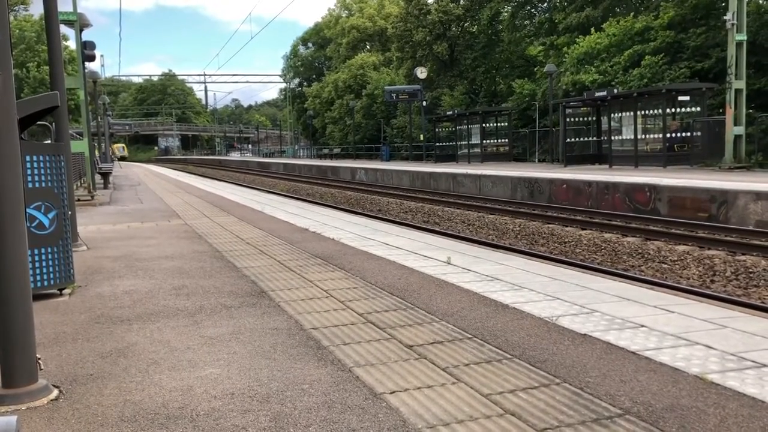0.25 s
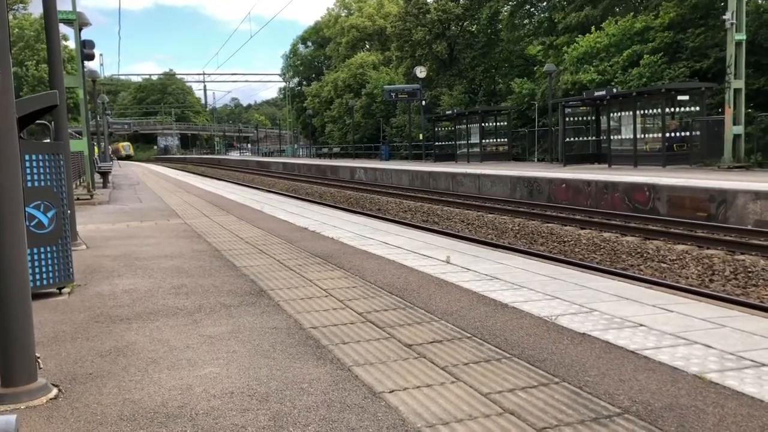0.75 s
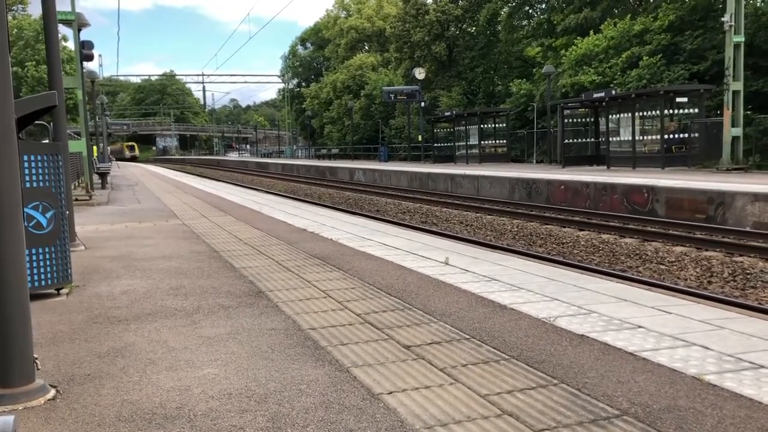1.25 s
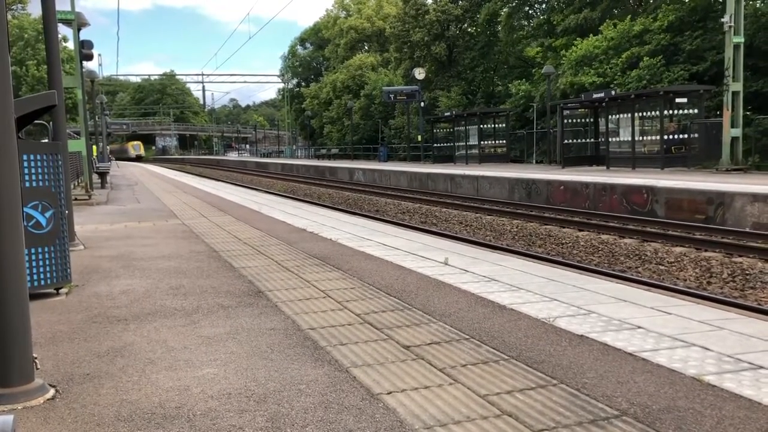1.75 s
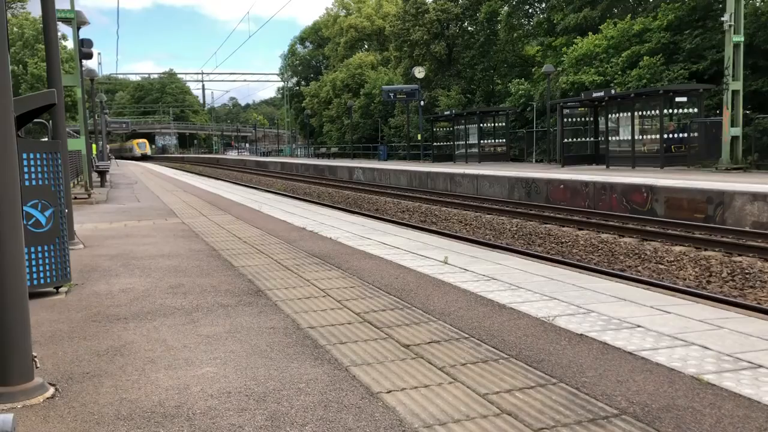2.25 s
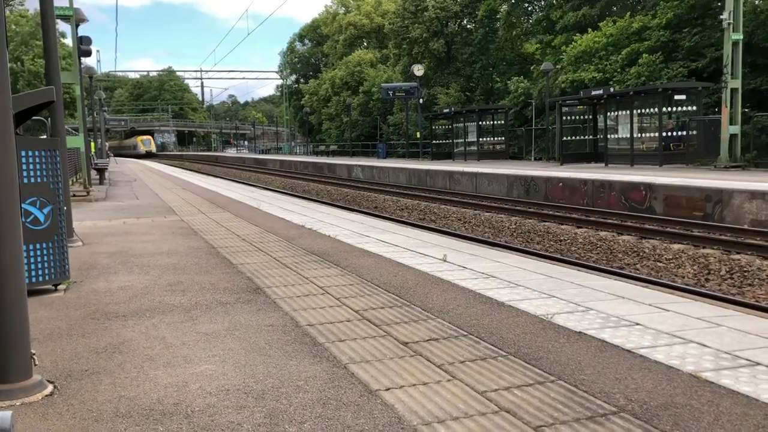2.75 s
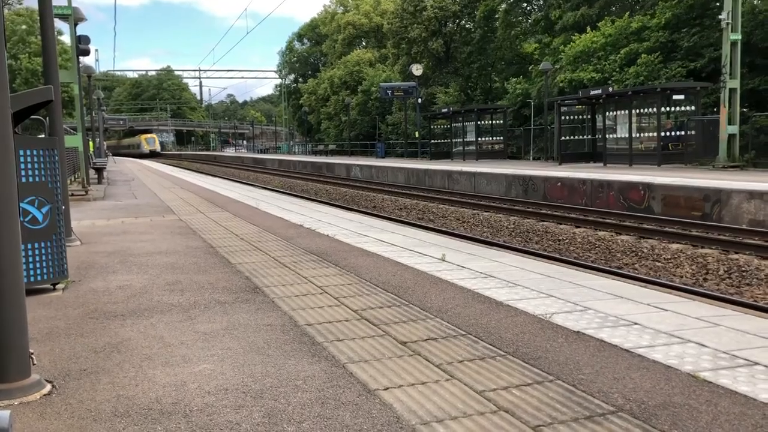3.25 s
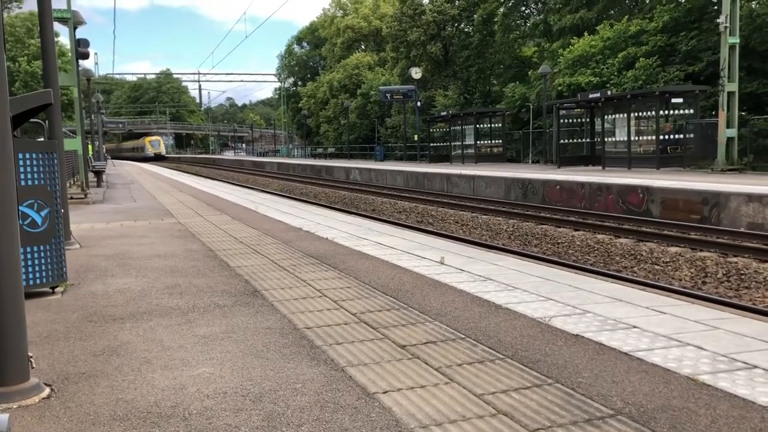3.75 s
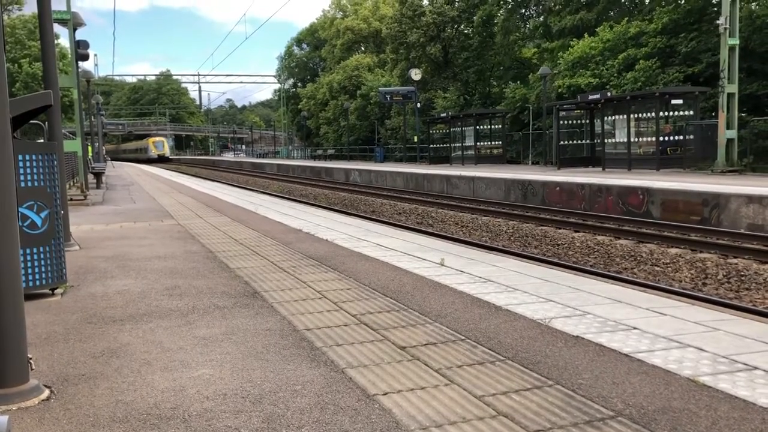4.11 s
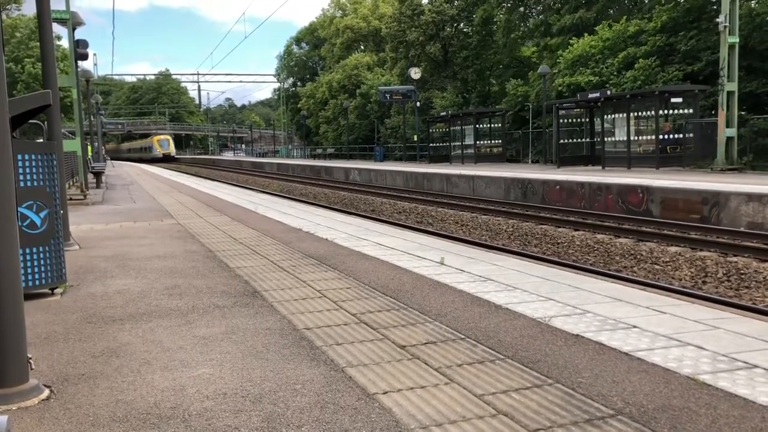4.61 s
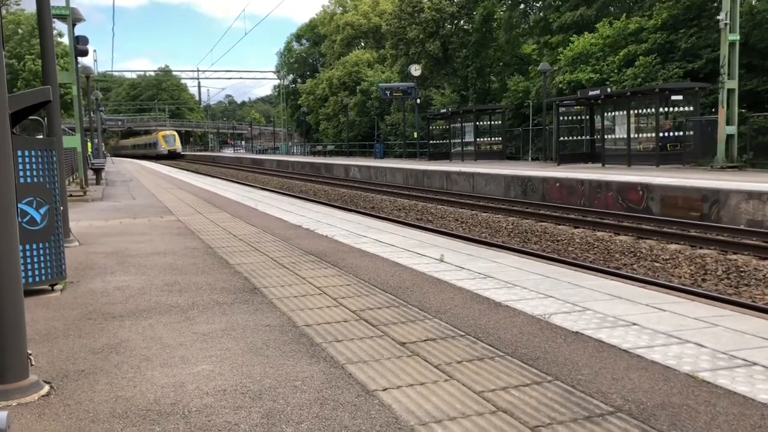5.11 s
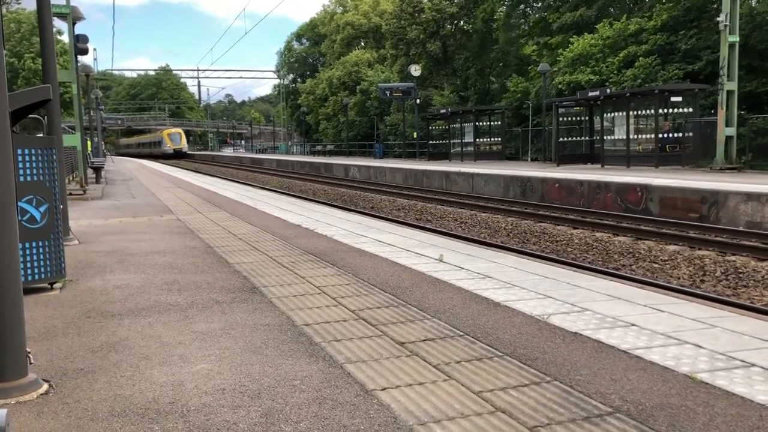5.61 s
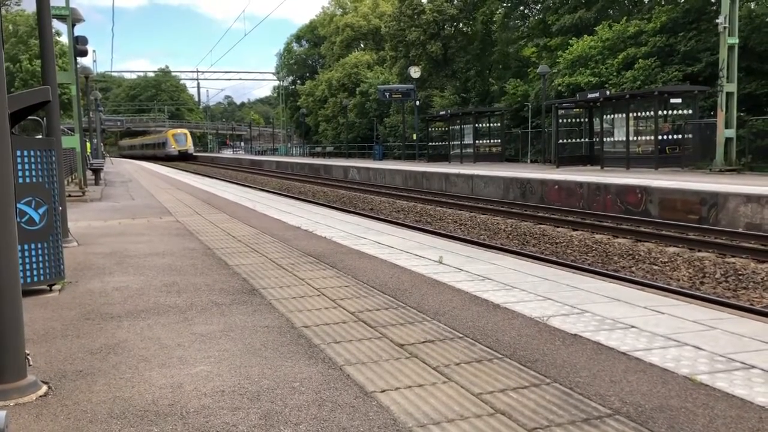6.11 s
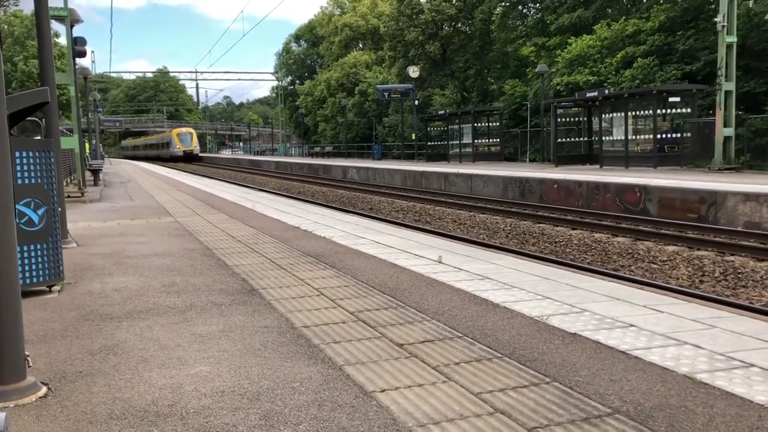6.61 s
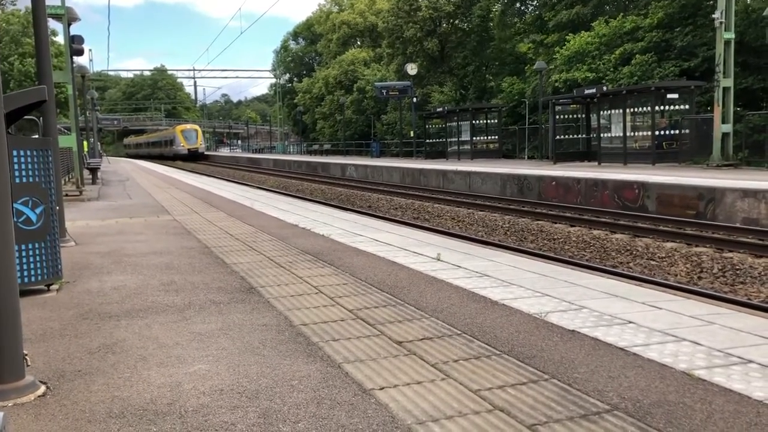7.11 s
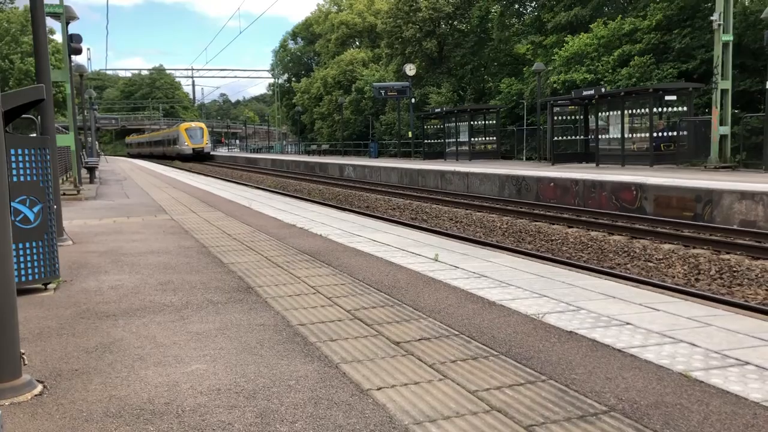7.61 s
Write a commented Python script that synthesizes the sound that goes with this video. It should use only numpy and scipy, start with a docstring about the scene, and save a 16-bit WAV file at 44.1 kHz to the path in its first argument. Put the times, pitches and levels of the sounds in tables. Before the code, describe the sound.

Bright, piercing rail hiss with a thin fluttering whistle and high squeals shimmers as a train nears an outdoor platform, then stops abruptly.

```python
"""Electric train nearing a platform

An electric train rolls towards an open platform, heard by one microphone far down the line.
Patchy noise bands make the loud, bright hiss of wheels on rails; fluttering modes and sines whistle and squeal.
The rubbing stops abruptly, and narrow modes that swelled beneath it ring out.
Under it lie roar, gears, motor hum and outdoor air, all noise or tones; late wind bumps are low noise and pulses.
"""
import sys
import numpy as np
from scipy import signal
from scipy.fft import rfft, irfft, next_fast_len
from scipy.io import wavfile
from scipy.ndimage import uniform_filter1d, map_coordinates

SR = 44100
rng = np.random.default_rng(int(sys.argv[2]) if len(sys.argv) > 2 else 0)


def generate_wav(signal):
    """Clip the signal to [-1, 1] and save it as 16-bit WAV at the path in sys.argv[1]."""
    frames = np.transpose(np.atleast_2d(signal))
    scaled = np.clip(frames, -1, 1) * 32767
    pcm = np.round(scaled).astype(np.int16)
    wavfile.write(sys.argv[1], SR, pcm)


N = 346626
TIME = np.arange(N) / SR
MIDWAY_S = 4  # about halfway through the approach, where the layers' levels are given


def amp(db):
    """Decibels to gain."""
    return 10 ** (np.asarray(db) / 20)


def unit(x):
    """Scale to rms 1."""
    return x / np.sqrt(np.mean(np.abs(x) ** 2) + 1e-20)


def curves(rows):
    """One value per sample for each column after the time."""
    times, *columns = np.transpose(rows)
    return [np.interp(TIME, times, column) for column in columns]


def wobble(rate):
    """A smooth random curve of rms 1, rate knots a second."""
    knots = rng.standard_normal(int(N * rate / SR) + 4)
    return unit(map_coordinates(knots, [TIME * rate]))


def filtered(x, response):
    """Apply a response of frequency to x."""
    size = next_fast_len(N + SR // 4)  # padding keeps the tail from wrapping round
    return irfft(rfft(x, size) * response(np.fft.rfftfreq(size, 1 / SR)), size)[:N]


def colour(hz, spectrum, modes):
    """Gain of a broad spectrum with resonances standing on it."""
    knot_hz, knot_db = np.transpose(spectrum)
    broad_db = np.interp(np.log(hz + 1), np.log(knot_hz), knot_db)
    lift = sum((amp(peak_db) ** 2 - 1) / (1 + (2 * (hz - centre) / width) ** 2)
               for centre, width, peak_db in modes)
    return amp(broad_db) * np.sqrt(np.maximum(1 + lift, .05))


def rush(spectrum, modes, patchy_db):
    """Coloured noise of rms 1 in which narrow bands swell and fade on their own."""
    z = signal.stft(rng.standard_normal(N), nperseg=2048)[2]
    field = uniform_filter1d(rng.standard_normal(z.shape), size=2, axis=0)  # across frequency
    field = uniform_filter1d(field, size=9, axis=1)  # along time
    noise = signal.istft(z * amp(patchy_db * unit(field)), nperseg=2048)[1][:N]
    return unit(filtered(noise, lambda hz: colour(hz, spectrum, modes)))


def driven_mode(pitch_hz, width, skirt):
    """One mode shaken at random: a fuzzy, fluttering line of rms 1 (width and skirt in Hz)."""
    shape = lambda hz: 1 / (1 + 2j * hz / width) / (1 + (hz / skirt) ** 2)
    swing = filtered(rng.standard_normal(N), shape) + 1j * filtered(rng.standard_normal(N), shape)
    carrier = np.exp(2j * np.pi * np.cumsum(pitch_hz * np.ones(N)) / SR)
    return unit(np.real(swing * carrier))


def swell(peak, half, pitch_hz, waver, flutter_db):
    """A sine under a bell-shaped envelope, wavering by a few Hz and fluttering in level."""
    span = np.abs(TIME - peak) < 2.5 * half
    t = TIME[span]
    knots = np.linspace(0, TIME[-1], num=400)
    drift, flutter = [np.interp(t, knots, row) for row in rng.standard_normal((2, 400))]
    sine = np.sqrt(2) * np.sin(2 * np.pi * np.cumsum(pitch_hz + waver * drift) / SR)
    tone = np.zeros(N)
    tone[span] = sine * amp(flutter_db * flutter) * np.exp(-((t - peak) / half) ** 2)
    return tone


def swells(rows):
    """Summed gain of bell-shaped swells, one for each (peak time [s], half length [s], level [dB])."""
    return sum(amp(db) * np.exp(-((TIME - peak) / half) ** 2) for peak, half, db in rows)


def follow(control, db, share, rise_db_per_s):
    """Gain that takes a share of a control's swings about its mean, with a steady drift in dB."""
    control_db, = curves(control)
    swing_db = control_db - control_db.mean()
    return amp(db + share * swing_db + rise_db_per_s * (TIME - MIDWAY_S))


# Deep rumble coming and going along the line: (peak time [s], half length [s], level [dB])
RUMBLE_SWELLS = [(1.2, 2.5, -61.5), (4.6, 1.1, -57)]
# Rumble tone colour: (frequency [Hz], relative level [dB])
RUMBLE = [(20, -35), (42, -3), (68, 1.5), (110, -11), (200, -4), (500, -34)]
# Outdoor air tone colour: (frequency [Hz], relative level [dB])
AIR = [(20, -36), (45, -6), (80, -2), (150, 0), (220, 0), (320, 0.5), (600, -4.5), (1200, -2), (2200, -18),
       (4000, -23), (8000, -27), (15700, -23)]


def outdoors():
    """Steady noise for still air over the platform, and swelling low noise for a far rumble."""
    rumble = swells(RUMBLE_SWELLS) * rush(RUMBLE, [], patchy_db=-0.5)
    return amp(-51.5) * rush(AIR, [], patchy_db=1.0) + rumble


# Gusts at the microphone: (peak time [s], half length [s], level [dB])
GUSTS = [(6.72, .06, -42), (7.13, .16, -51.5), (7.48, 0.13, -42), (7.65, 0.031, -38), (7.84, 0.17, -39)]
# Buffeting tone colour: (frequency [Hz], relative level [dB])
BUFFET = [(20, -35), (50, 1), (95, 4), (160, -6.0), (240, -21), (800, -48)]
# Single eddies hitting the microphone: (time [s], nominal level [dB], starting pitch [Hz], decay time [s])
BUMPS = [(6.674, -25.5, 181, 0.014), (7.397, -23.5, 160, 0.015), (7.472, -31, 200, 0.029),
         (7.614, -19.5, 169, 0.014)]


def wind():
    """Low buffeting, with single eddies that push once and die away."""
    buffet = swells(GUSTS) * amp(1.8 * wobble(22)) * rush(BUFFET, [], patchy_db=-2.0)
    for start, db, hz, length in BUMPS:
        age = np.maximum(TIME - start, 0) / length
        churn_response = lambda f: 1 / (1 + (f / (2.0 * hz)) ** 3)
        churn = unit(filtered(rng.standard_normal(N), churn_response))
        push = np.sin(2 * np.pi * hz * length * 3 * np.log1p(age / 3))  # pitch sinks as the eddy slows
        envelope = 1.86 * (1 - np.exp(-3 * age)) * np.exp(-age)
        buffet = buffet + amp(db) * envelope * (0.51 * push + 0.42 * churn)
    return buffet


# Uneven level of the low-mid roar, of which only the deviation from the mean counts: (time [s], level [dB])
ROLL = [(0.0, -50.5), (0.96, -44.5), (1.22, -41), (1.29, -48), (1.38, -39.5), (1.64, -47), (1.92, -40.5),
        (4.97, -36.5), (5.06, -44.5), (5.51, -37), (5.6, -47.5), (5.84, -40.5), (5.89, -44.5),
        (6.37, -37.5), (6.44, -47), (6.63, -40.5), (7.03, -47), (7.62, -42.5), (7.73, -62), (7.86, -47)]
# Roar tone colour: (frequency [Hz], relative level [dB])
ROAR = [(200, -27), (400, -10), (650, -6), (950, -0.5), (1300, -5), (1450, -14), (2200, -36)]
# Roar resonances: (centre [Hz], width [Hz], level over the broad spectrum [dB])
ROAR_MODES = [(475, 15, 8.8), (574.5, 15, 12.4), (698, 31, 10.8), (743, 41, 13.5), (868, 32, 11.2),
              (925, 23, 9.6), (1067, 28, 8.6), (1226, 23, 6.3), (1336, 27, 10)]


def rolling_roar():
    """The distant roll: resonant low-mid noise with an uneven, flickering level."""
    gain = follow(ROLL, db=-42.5, share=1.0, rise_db_per_s=-0.24) * amp(1.1 * wobble(40))
    return gain * rush(ROAR, ROAR_MODES, patchy_db=3.0)


# Brief grating of the running gear: (peak time [s], half length [s], level [dB])
GEAR_SWELLS = [(3.24, 0.077, -50.5)]
# Gear tone colour: (frequency [Hz], relative level [dB])
GEAR = [(1000, -17), (1500, 0.5), (1850, 5), (2050, -1), (2700, -10), (3200, -8), (3800, -19), (4500, -13),
        (7000, -47)]
# Gear resonances: (centre [Hz], width [Hz], level over the broad spectrum [dB])
GEAR_MODES = [(1566, 88, 11.2), (1753, 62, 10.7), (1855, 60, 7.2), (2150, 48, 10), (2360, 106, 10)]


def running_gear():
    """Resonant mid noise, uneven like the roar, that rises as the train nears and grates briefly."""
    gain = follow(ROLL, db=-51.0, share=0.82, rise_db_per_s=0.95) + swells(GEAR_SWELLS)
    return gain * rush(GEAR, GEAR_MODES, patchy_db=4.0)


# Swells of the motor hum: (peak time [s], half length [s], level [dB])
HUM_SWELLS = [(1.34, 0.24, -49), (2.0, 0.089, -50)]


def motor_hum(start_hz=514, sag_hz_per_s=20, start_db=-62.5, fade_db_per_s=0.5):
    """A wavering sine that sinks with the speed and fades, apart from two swells."""
    pitch_hz = start_hz - sag_hz_per_s * TIME + 1.48 * wobble(14)
    gain = amp(start_db - fade_db_per_s * TIME) + swells(HUM_SWELLS)
    return gain * amp(1.5 * wobble(17)) * unit(np.sin(2 * np.pi * np.cumsum(pitch_hz) / SR))


# Swells of the running gear's whine: (peak time [s], half length [s], level [dB])
WHINE_SWELLS = [(1.1, 1.1, -52.5), (6.82, 0.32, -45.5), (7.45, 0.26, -47.5)]


def gear_whine():
    """One randomly driven mode, heard only in swells."""
    return swells(WHINE_SWELLS) * driven_mode(1088, width=72, skirt=56)


# Tone colour of the nearing train: (frequency [Hz], relative level [dB])
NEAR = [(100, -16), (500, 14), (1100, -3), (1600, -6.5), (2400, -2.5), (3100, 3.5), (3800, 0), (4800, 5.5),
        (7200, -3), (10000, -6), (15700, -24)]
# Its resonances: (centre [Hz], width [Hz], level over the broad spectrum [dB])
NEAR_MODES = [(755, 62, 4.8), (1110, 65, 6.6), (1340, 50, 5.6), (1570, 55, 8), (1880, 43, 17),
              (2030, 67, 11), (2305, 130, 13.5), (3150, 200, 3.1), (4140, 86, 5)]


def nearing_rush():
    """Broad resonant noise that grows steadily as the train nears, 2.2 dB a second."""
    return amp(-45.5 + 2.2 * (TIME - TIME[-1])) * rush(NEAR, NEAR_MODES, patchy_db=2.5)


def train():
    """The rolling train under the rail noise: roar, gear, hum, whine and rush."""
    return rolling_roar() + running_gear() + motor_hum() + gear_whine() + nearing_rush()


# Steel modes that outlast the rubbing: (frequency [Hz], level at the release [dB])
RING_OUT = [(12182, -41), (12295, -43), (13211, -49), (13248, -43), (14158, -53), (14395, -51),
            (15434, -45)]


def ring_out(release=7.6, t60=0.52):
    """Lightly damped modes build up under the hiss and outlast it (release and t60 in s)."""
    decay = amp(-60 * np.maximum(TIME - release, 0) / t60)
    envelope = np.clip(TIME / release, 0, 1) ** 4 * decay
    return envelope * sum(amp(db) * driven_mode(hz, width=10, skirt=50) for hz, db in RING_OUT)


# Squeals: (peak time [s], half length [s], frequency [Hz], level [dB])
SQUEALS = [(.4, .45, 15276, -33), (.8, .25, 15515, -38), (.8, .4, 13415, -37), (1.4, .17, 13102, -31),
           (1.98, .16, 13412, -21), (2.4, .3, 9180, -38), (2.55, .3, 13405, -35), (2.92, .17, 13483, -28),
           (3.0, .2, 14448, -33), (4.25, .25, 13408, -27), (4.62, .15, 13380, -28), (4.88, .08, 13380, -23),
           (5.1, .35, 14448, -34), (5.35, .15, 13366, -31), (5.54, .07, 9279, -26), (6.07, .13, 13480, -26),
           (6.55, .15, 13385, -32), (7.08, .15, 13460, -31)]


def squeals():
    """Stick-slip squeals, each a high sine that wavers, flutters, swells and fades."""
    return sum(amp(db) * swell(peak, half, hz, waver=6.8, flutter_db=3.5)
               for peak, half, hz, db in SQUEALS)


def rubbing(stop_s=7.575, fall_db_per_s=163):
    """Gain that holds while the wheels rub and falls fast once they stop."""
    return amp(-fall_db_per_s * np.maximum(TIME - stop_s, 0))


# Level of the whistling band, counted as uneven swings about the mean: (time [s], level [dB])
WHISTLE = [(0.0, -37), (1.81, -30), (2.1, -34), (2.36, -25.5), (2.67, -28.5), (3.07, -23), (3.75, -30),
           (3.79, -25.5), (5.58, -22), (5.64, -27.5), (6.13, -22), (6.34, -26.5), (7.09, -27.5),
           (7.41, -23.5), (7.56, -33)]
# Flares of the whistle: (peak time [s], half length [s], level [dB])
WHISTLE_FLARES = [(2.36, .07, -33), (3.08, 0.027, -23), (4.68, .07, -30), (5.1, .04, -27),
                  (6.08, 0.056, -25.5), (7.28, 0.051, -28)]


def whistle(start_hz=7270, sag_hz=80, settle_s=4, flutter_db=2.5):
    """One wheel mode flutters, flares and sinks as the train slows; a lower one sings faintly with it."""
    pitch_hz = start_hz - sag_hz * (1 - np.exp(-TIME / settle_s))
    gain = follow(WHISTLE, db=-31.7, share=1.27, rise_db_per_s=0.25) + swells(WHISTLE_FLARES)
    main = gain * driven_mode(pitch_hz + 7 * wobble(9), width=49, skirt=145)
    under_gain = follow(WHISTLE, db=-49, share=1.0, rise_db_per_s=-1.1)
    under = under_gain * driven_mode(5635, width=51, skirt=31)
    return (main * amp(flutter_db * wobble(32)) + under) * rubbing()


# Tone colour of the band around the whistle: (frequency [Hz], relative level [dB])
BAND = [(6700, -39), (7010, 0.5), (7075, 2), (7150, 0.5), (7320, 1.5), (7430, 5.5), (7500, 4.5),
        (7590, 0.5), (7690, -2.5), (8000, -35)]


def whistle_band():
    """A noise band around the whistle that shares its uneven level."""
    return follow(WHISTLE, db=-31.5, share=0.68, rise_db_per_s=-0.1) * rush(BAND, [], patchy_db=2.0)


# Level of the bright hiss, counted as uneven swings about the mean: (time [s], level [dB])
HISS_LEVEL = [(0.0, -33), (0.46, -25.5), (0.82, -27), (1.05, -20.5), (1.2, -26.5), (1.32, -21),
              (1.73, -25.5), (1.94, -19.5), (2.48, -23.5), (2.92, -18.5), (3.75, -23), (3.92, -18),
              (4.51, -17), (4.76, -20), (4.88, -16), (4.95, -19), (5.45, -15.5), (5.56, -23.5), (5.96, -16),
              (6.42, -21.5), (6.7, -17.5), (6.93, -22), (7.35, -17.5), (7.56, -24)]
# Body tone colour: (frequency [Hz], relative level [dB])
BODY = [(3000, -43), (4000, -25), (4700, -13.5), (5300, -12), (6200, -5.5), (6700, -1.5), (7000, -1),
        (7600, -7.5), (9000, -42)]
# Body resonances: (centre [Hz], width [Hz], level over the broad spectrum [dB])
BODY_MODES = [(5085, 54, 7.5), (5340, 54, 4.6), (5606, 83, 9.1), (5920, 37, 4.3), (6160, 35, 4.9)]


def rail_body():
    """The lower part of the rubbing: resonant noise that gains as the train nears."""
    gain = follow(HISS_LEVEL, db=-36.0, share=0.85, rise_db_per_s=1.15)
    return gain * rush(BODY, BODY_MODES, patchy_db=3.5)


# Hiss tone colour: (frequency [Hz], relative level [dB])
HISS = [(5000, -32), (6800, -9), (7800, -1.5), (8400, 0.5), (9500, 1.5), (10100, 0), (11000, -5.5),
        (13000, -24)]
# Hiss resonances: (centre [Hz], width [Hz], level over the broad spectrum [dB])
HISS_MODES = [(8840, 80, 1.6), (9280, 46, 3.4), (9190, 26, 11.5)]


def rail_hiss():
    """The middle part of the rubbing: resonant noise that gains as the train nears."""
    gain = follow(HISS_LEVEL, db=-31.0, share=0.95, rise_db_per_s=1.24)
    return gain * rush(HISS, HISS_MODES, patchy_db=2.5)


# Fizz tone colour: (frequency [Hz], relative level [dB])
FIZZ = [(7500, -44.5), (9500, -10.5), (10300, -5.5), (11300, -1), (12500, 0.5), (13400, 0), (13800, -2.5),
        (14800, -9), (15700, -7.5)]
# Fizz resonances: (centre [Hz], width [Hz], level over the broad spectrum [dB])
FIZZ_MODES = [(11220, 160, 3), (12215, 100, 6), (12390, 90, 4), (13260, 90, 3), (13420, 110, 2),
              (15520, 70, 3)]


def rail_fizz():
    """The brightest, loudest part of the rubbing: resonant noise with an uneven level."""
    gain = follow(HISS_LEVEL, db=-20.5, share=0.98, rise_db_per_s=-0.05)
    return gain * rush(FIZZ, FIZZ_MODES, patchy_db=2.0)


def thicket(hz, spacing, depth_db):
    """Countless narrow steel modes of random strength, spacing Hz apart."""
    knots = np.arange(0, SR / 2, spacing)
    return amp(depth_db * np.interp(hz, knots, rng.standard_normal(len(knots))))


def rails():
    """Wheel friction excites a thicket of steel modes; all bands shimmer together until it stops."""
    bright = filtered(rail_fizz() + rail_hiss(), lambda hz: thicket(hz, spacing=16, depth_db=2))
    shimmer = amp(0.49 * wobble(70))
    return (bright + rail_body() + whistle_band()) * rubbing() * shimmer


# Hard surfaces beside the microphone: (delay [s], share of the direct sound [gain])
ECHOES = [(.00581, .2), (.0018, .05)]


def close_echoes(direct):
    """Add the delayed copies thrown back by hard surfaces."""
    return filtered(direct, lambda hz: 1 + sum(share * np.exp(-2j * np.pi * hz * delay)
                                               for delay, share in ECHOES))


def scene():
    """Train and rails with close echoes, in outdoor air; both channels carry the one microphone."""
    direct = train() + ring_out() + squeals() + whistle() + rails()
    mono = outdoors() + wind() + close_echoes(direct)
    return np.array([mono, mono])


def record(dry, low_hz=38, top_hz=15760):
    """The recorder sheds the deepest bass and keeps nothing above its band limit."""
    passband = lambda hz: (hz < top_hz) * hz ** 4 / np.sqrt(hz ** 8 + low_hz ** 8)
    return np.array([filtered(channel, passband) for channel in dry])


dry = scene()
out = record(dry)
generate_wav(out)
```